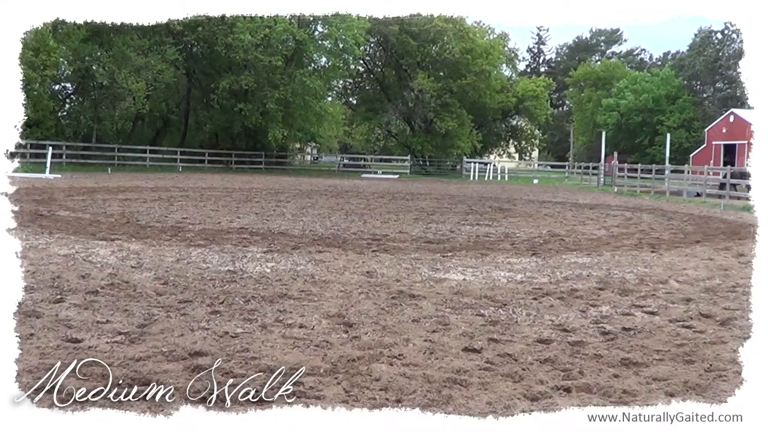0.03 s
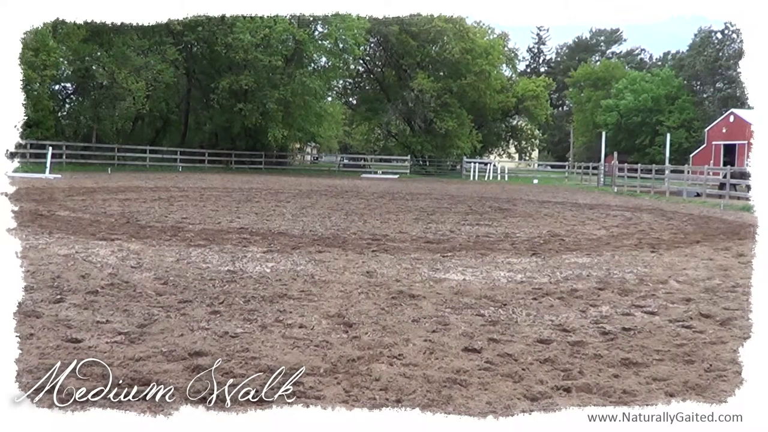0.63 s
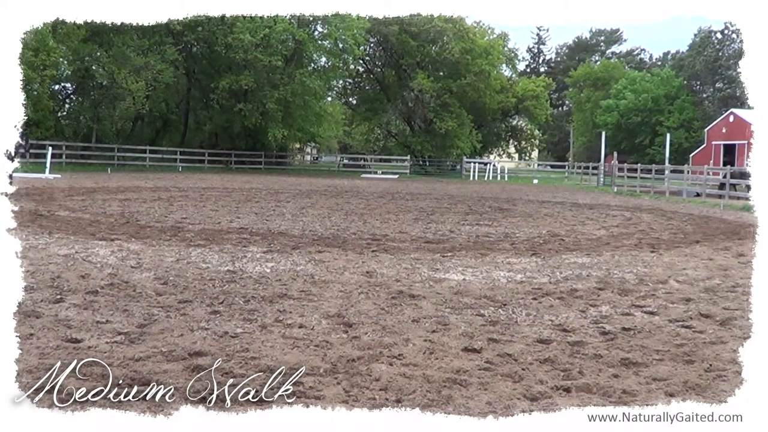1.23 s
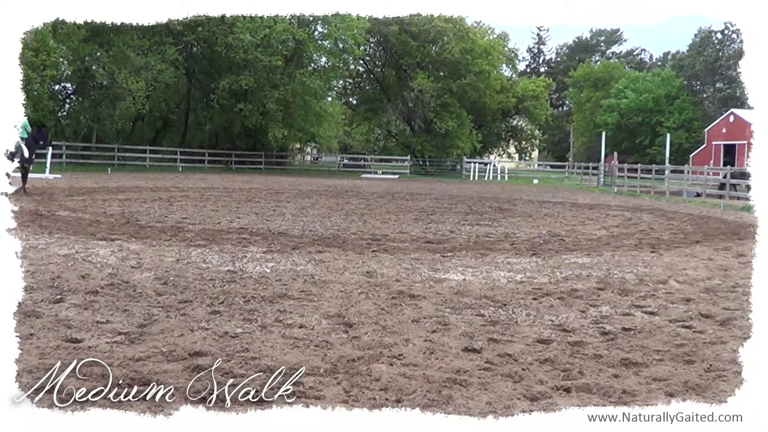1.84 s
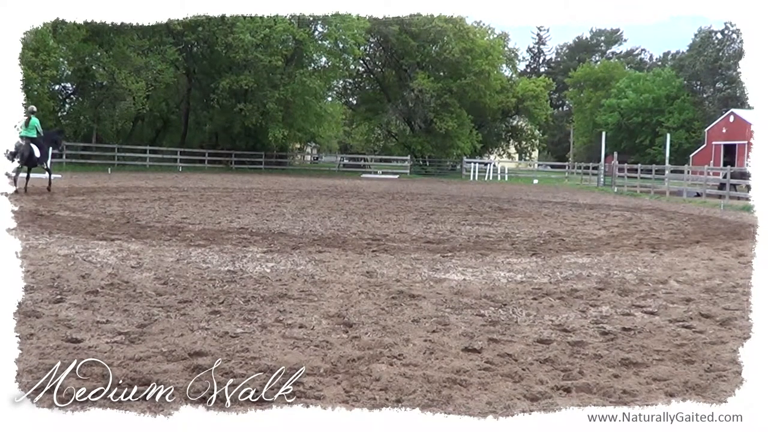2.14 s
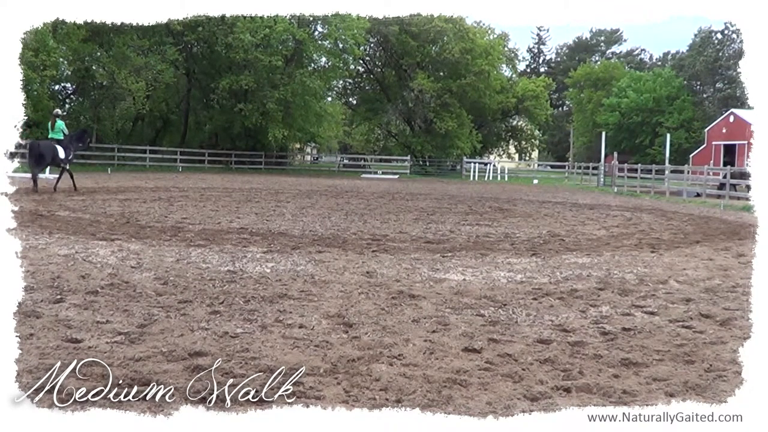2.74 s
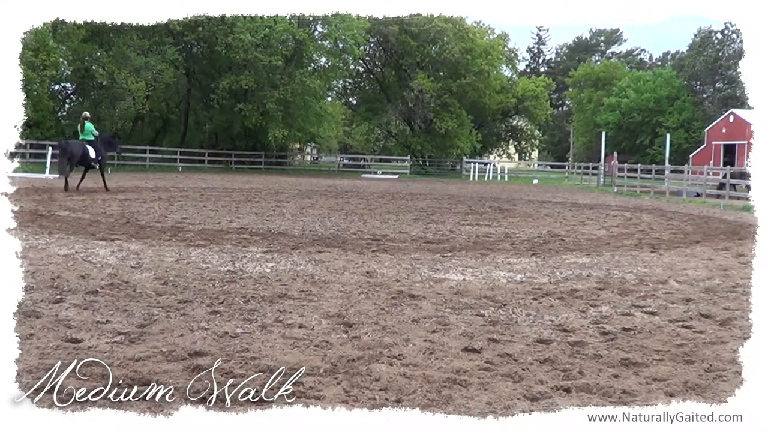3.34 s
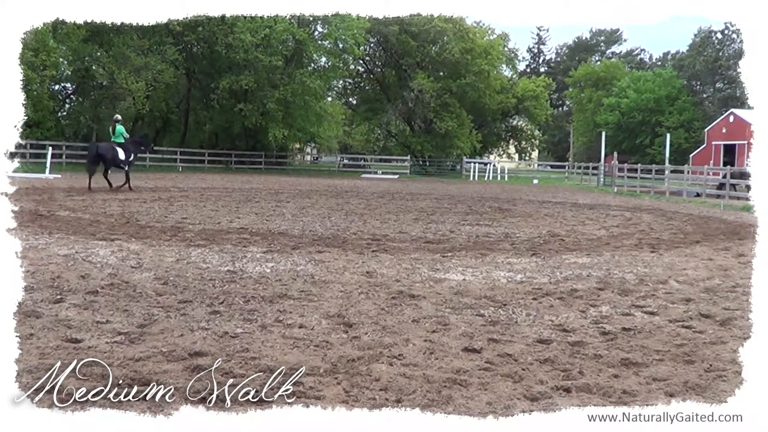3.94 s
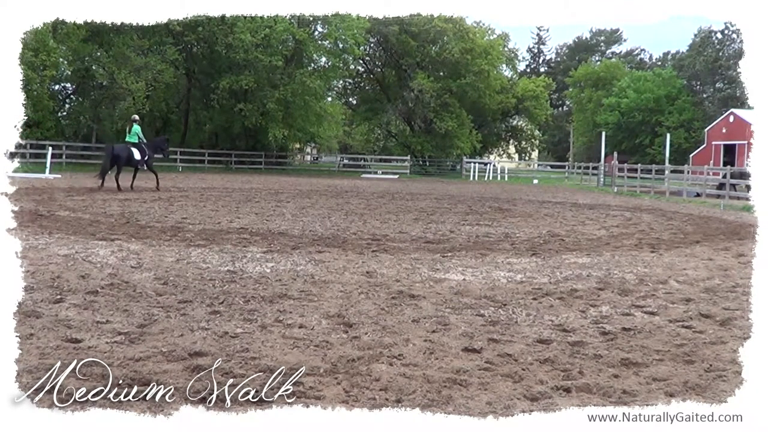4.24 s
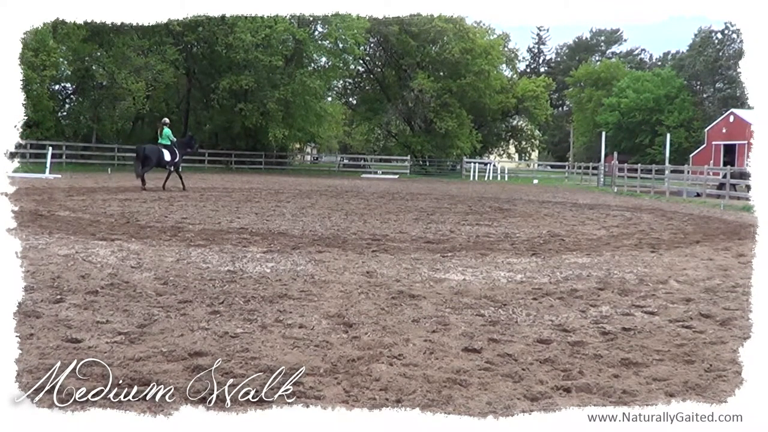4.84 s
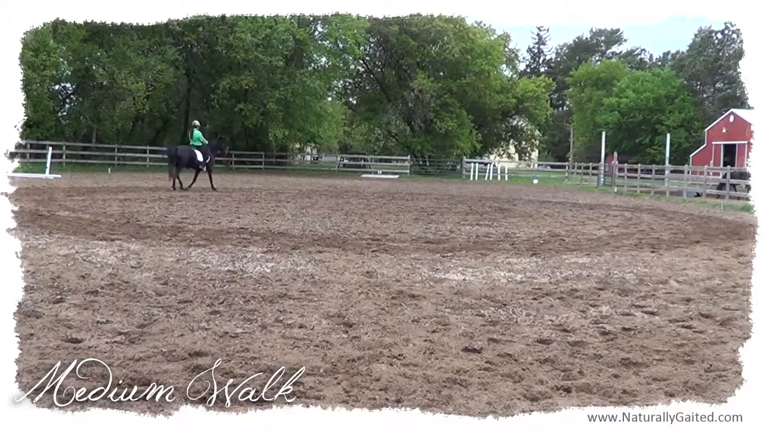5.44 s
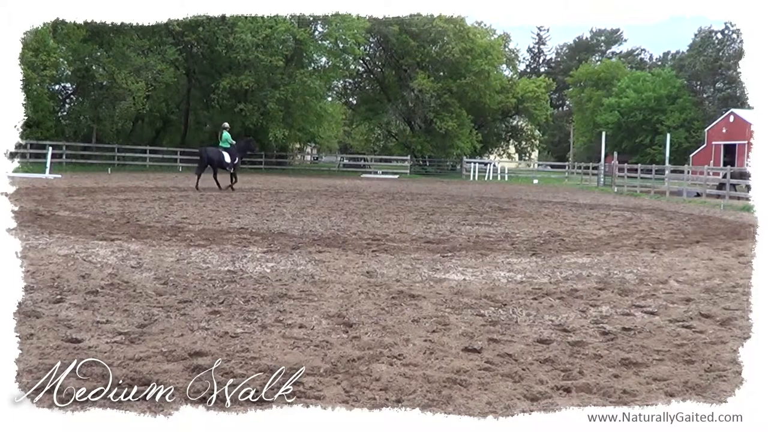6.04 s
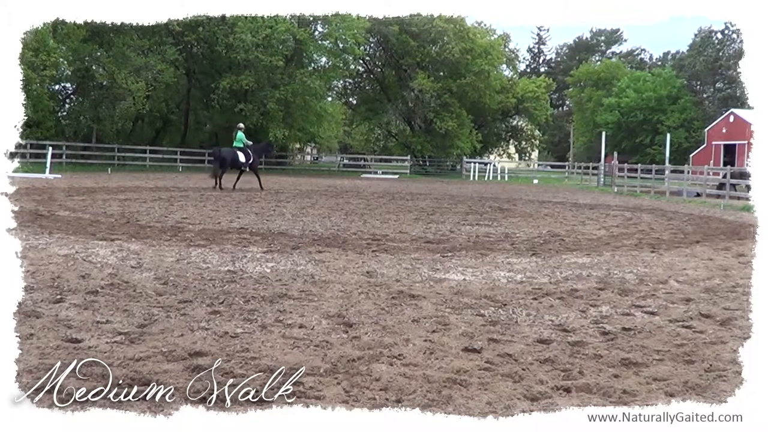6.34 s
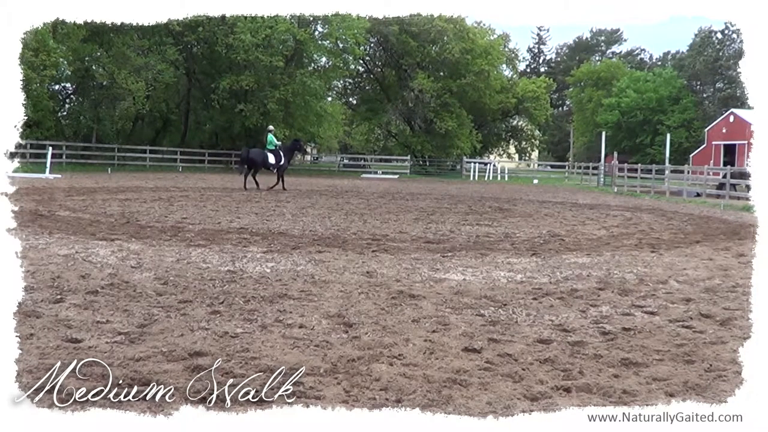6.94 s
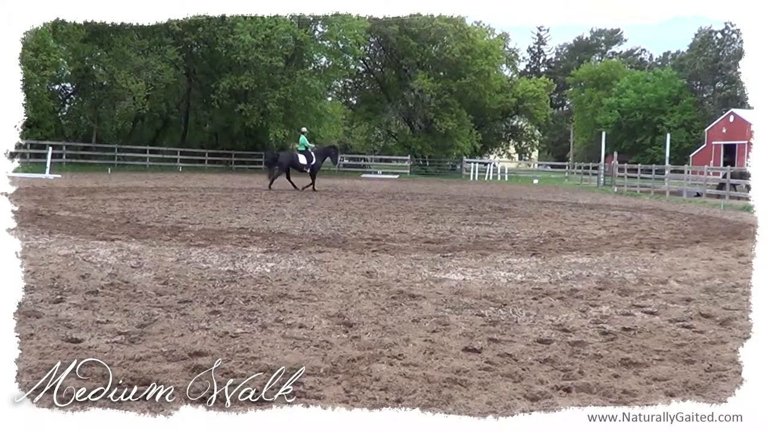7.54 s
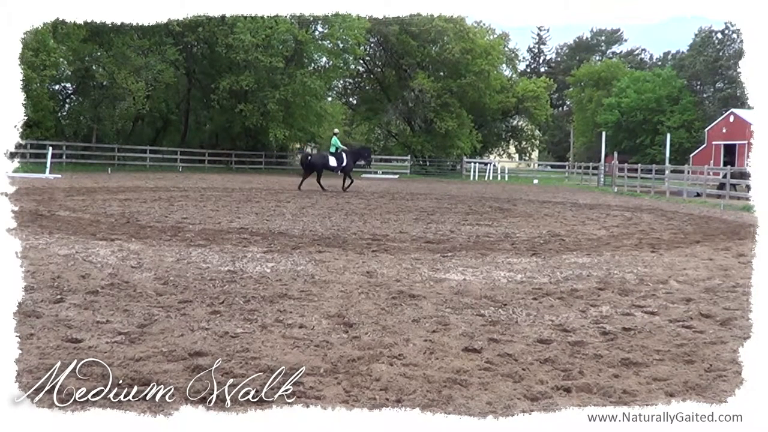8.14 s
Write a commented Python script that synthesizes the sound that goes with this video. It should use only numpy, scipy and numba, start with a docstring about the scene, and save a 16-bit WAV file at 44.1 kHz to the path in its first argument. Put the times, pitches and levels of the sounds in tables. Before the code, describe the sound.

Wind buffets the microphone in one strong gust, then light puffs, over steady hiss and faint distant birds.

```python
"""Wind buffets a camcorder beside an outdoor riding arena: one strong gust, then light puffs.
Eddies sweep over the two microphone ports, louder and higher the faster they pass.
Behind them: hiss, the camcorder's whine, light metal clinks, faint birds in the trees,
an insect and soft scuffs in the sand. The camcorder turns its gain down on loud treble peaks."""
import sys
import numpy as np
from scipy import signal
from scipy.fft import rfft, irfft, next_fast_len
from scipy.io import wavfile
from scipy.ndimage import uniform_filter1d, map_coordinates
from numba import njit

SR = 44100
rng = np.random.default_rng(int(sys.argv[2]) if len(sys.argv) > 2 else 0)


def persist_wave(psi):
    """Save psi, clipped to +-1, as 16-bit WAV."""
    counts = np.round(np.clip(psi, -1, 1) * 32767).astype(np.int16)
    wavfile.write(sys.argv[1], SR, np.atleast_2d(counts).T)


N = 360738
T = np.arange(N) / SR

# Wind between buffets. Each row: time in seconds, large-eddy level in dB.
BASE_WIND = [(.07, -35.5), (.25, -27.5), (.62, -28.5), (.76, -38.5), (.9, -31), (1.01, -36), (1.12, -25),
             (1.3, -21), (1.5, -24.5), (1.6, -29.5), (1.9, -34.5), (2.1, -39), (2.22, -52), (2.9, -52),
             (3.14, -37.5), (3.5, -44.5), (3.75, -58), (4.2, -53.5), (4.48, -44.5), (4.7, -58), (5.8, -57),
             (6.02, -44), (6.7, -58), (6.92, -47.5), (7.08, -51.5), (7.2, -43.5), (7.45, -45.5),
             (7.65, -65.5)]
# Rushes of air. Each row: start in seconds, length in seconds, level in dB, extra small eddies in dB.
BUFFETS = [(0.058, 0.015, -19.5, -2.5), (0.127, 0.036, -30, -2), (0.17, 0.017, -21, -1),
           (0.19, 0.025, -17.5, 1.5), (0.243, 0.015, -20.5, -1), (0.294, 0.024, -18, 2),
           (0.324, 0.066, -20, 1), (0.433, 0.021, -23.5, -3.5), (0.45, 0.04, -17, 1),
           (0.541, 0.017, -17, 0), (0.585, 0.046, -21.5, 1), (0.64, 0.031, -22.5, 1.5),
           (0.681, 0.037, -24, 0.5), (0.785, 0.012, -25.5, -2.5), (0.829, 0.045, -19.5, 0),
           (0.912, 0.074, -23, -0.5), (1.04, 0.028, -17.5, -3), (1.076, 0.086, -18.5, 3),
           (1.193, 0.036, -19.5, -0.5), (1.223, 0.043, -19, 6), (1.264, 0.023, -18, 7.5),
           (1.299, 0.051, -13.5, -1.5), (1.37, 0.034, -16, .5), (1.425, 0.053, -15.5, 2),
           (1.514, 0.031, -23, -1), (1.58, 0.021, -24.5, 2), (1.633, 0.013, -22, -3),
           (1.659, 0.011, -17, 3), (1.743, 0.044, -23.5, 2.5), (1.806, 0.029, -27, 2.5),
           (1.924, 0.073, -35, -1), (2.041, 0.045, -38.5, -2), (2.138, 0.023, -41, 0),
           (2.252, 0.023, -42.5, -0.5), (2.349, 0.021, -47, -1.5), (2.484, 0.027, -37.5, -3),
           (2.545, 0.012, -44.5, -0.5), (2.659, 0.038, -41, -3), (2.744, 0.013, -50.5, -1.5),
           (2.81, 0.02, -44, -1), (2.853, 0.015, -39, 3), (2.905, .012, -39, -2), (2.976, 0.04, -33, -1.5),
           (3.039, 0.021, -28, -6), (3.092, 0.013, -21, 4.5), (3.107, 0.065, -28, 1.5),
           (3.204, 0.02, -32.5, -3.5), (3.244, 0.012, -33, -4), (3.305, 0.013, -30, 4.5),
           (3.327, 0.016, -34, -9.5), (3.377, 0.082, -34.5, 6), (3.471, 0.03, -35, -1),
           (4.007, 0.055, -40.5, 0), (4.098, 0.018, -43, -3.5), (4.296, 0.019, -38.5, -6),
           (4.343, 0.039, -33, -4), (4.414, 0.12, -40.5, 1.5), (4.57, 0.033, -44, -1.5),
           (4.784, 0.018, -43.5, -2.5), (4.947, 0.027, -47, -2.5), (5.057, .02, -46, -3),
           (5.092, 0.021, -40, -8.5), (5.181, 0.036, -44.5, -8.5), (5.243, 0.053, -43.5, -3.5),
           (5.404, 0.032, -47, -3.5), (5.559, .018, -44, -6), (5.641, 0.04, -43, -4),
           (5.744, 0.027, -41.5, -9), (5.871, 0.021, -41, 0.5), (5.922, 0.092, -36, 2.5),
           (6.054, 0.027, -37.5, -2), (6.095, 0.076, -37, -6.5), (6.204, 0.023, -33.5, -7.5),
           (6.357, 0.094, -40, 0), (6.604, 0.021, -44.5, -4.5), (6.868, 0.024, -37.5, -6.5),
           (6.943, 0.085, -42.5, -2), (7.178, 0.045, -35.5, 1.5), (7.331, 0.1, -40.5, 2),
           (7.461, 0.042, -44.5, 2), (7.83, 0.022, -51, -4.5), (8.128, 0.02, -55, -1)]
# Eddy pressure at unit speed. Each row: frequency in Hz, spectral density in dB.
EDDY_SPECTRUM = [(20, -45), (50, -23), (100, -8.5), (170, 0.5), (250, 3.5), (400, -0.5), (600, -7.5),
                 (1000, -15.5), (1500, -23.5), (2200, -36), (3200, -50), (6000, -99)]
# Which port takes more wind. Each row: time in seconds, left minus right in dB.
PORT_EXPOSURE = [(0, 6), (1.8, 10), (2.6, -9), (3.2, -9), (4.5, -10), (6, -1), (8.2, 3)]
# Stereo circuit response. Each row: frequency in Hz, side minus mid in dB.
WIDENING = [(25, 3), (60, -4.5), (130, -9), (240, -5), (400, -.5), (700, 3.5), (1300, 4.5), (2400, 1.5),
            (5000, -2)]
# Background hiss. Each row: frequency in Hz, relative spectral density in dB.
HISS_SPECTRUM = [(20, -20), (60, 18.5), (120, 13.5), (220, 6.5), (400, 4.5), (850, 4.5), (1450, -3.5),
                 (1750, -0.5), (2100, -4.5), (3000, -4.5), (3300, -0.5), (3700, -3.5), (4300, -4),
                 (5000, -6.5), (6500, -9), (11000, -9), (16000, -11)]
# Hiss width. Each row: frequency in Hz, side minus mid in dB.
HISS_WIDTH = [(60, -34), (200, -3), (600, -3.5), (1300, 0.5), (2400, -2.5), (4400, -4), (8000, -3.5),
              (10500, -15), (14000, -40)]
# Breeze in the trees. Each row: time in seconds, hiss gain in dB.
BREEZE = [(0, 0.5), (1, 1.6), (2.3, 0.3), (3, 1), (3.6, 2.3), (4.1, 0.5), (5.2, -0.5), (7, 0.1), (7.5, 0.6),
          (8.2, -1.5)]
# Camcorder tones. Each row: frequency in Hz, level in dB, pulse sharpness, waver in dB.
WHINE_TONES = [(2457.6, -68.7, .35, 2.5), (2517.6, -71.7, .5, 2.5), (10010, -75.7, 1.5, .5),
               (15554.5, -80, 5, .3), (15734.3, -66.5, .1, .3)]
# Lone eddies. Each row: start in seconds, peak in dB, pitch in Hz.
SLAPS = [(0.486, -18, 298), (0.62, -11, 297), (1.371, -5.5, 249.2), (1.419, 0, 240.2), (1.506, -11.5, 220),
         (1.584, -20.5, 549.5), (1.602, -15, 291.5), (1.649, -9.5, 420.2), (1.715, -22, 501),
         (1.729, -12, 232.7), (1.744, -25, 640), (1.808, -19.5, 440), (1.82, -16, 217.4),
         (1.837, -22, 339.5), (1.869, -14, 228.9), (1.995, -29, 548), (3.09, -15, 281), (3.272, -16.5, 446)]
# Metal contacts, as of tack. Each row: start in seconds, peak in dB.
CLINKS = [(0.581, -42), (5.793, -45), (7.05, -49), (7.663, -44)]
# Metal modes. Each row: frequency in Hz, relative level in dB, T60 in seconds.
CLINK_MODES = [(2960, 7, 0.033), (4310, 4, 0.057), (5400, -9, 0.018), (5470, -7, .02), (6800, -20, .01)]
# Bird whistles. Each row: start in seconds, length in seconds, pitch in Hz, level in dB.
WHISTLES = [(0.778, 0.041, 3450, -62.5), (0.958, 0.087, 4410, -62), (1.96, 0.064, 4573, -56.5),
            (2.092, 0.085, 4410, -58), (3.896, 0.063, 5130, -64), (7.262, 0.0456, 6104, -63),
            (7.357, 0.047, 6084, -60), (7.436, 0.031, 6120, -67)]
# Insect buzzes. Each row: start in seconds, length in seconds, level in dB.
BUZZES = [(0.88, 0.2, -64.5), (2.37, 0.35, -68), (3.856, 0.12, -70)]
# Twitters that stand out. Each row: start in seconds, pitch in Hz, level in dB.
TWITTERS = [(1.173, 4266, -59), (2.06, 4153, -57), (3.175, 4566, -64), (3.199, 4052, -61.5),
            (3.222, 3875, -65.5), (3.599, 4300, -64), (3.64, 4140, -64), (3.742, 3936, -62),
            (3.795, 4875, -64), (4.179, 4320, -66), (4.359, 4072, -65), (4.866, 4180, -65),
            (5.27, 4570, -69), (5.455, 4040, -65), (5.625, 4576, -63), (5.707, 4170, -61),
            (6.293, 4395, -59), (6.34, 4260, -60), (7.37, 4630, -61)]
# Quick rising chips. Each row: start in seconds, pitch in Hz, level in dB.
CHIPS = [(3.258, 4290, -59), (3.355, 5100, -63), (3.453, 5150, -59), (3.575, 5370, -55), (3.741, 5300, -62),
         (3.83, 5300, -65)]
# Thin falling bird ticks. Each row: start in seconds, pitch in Hz, level in dB.
TICKS = [(3.813, 9298, -61), (6.456, 9190, -52), (6.972, 7900, -63), (7.047, 7070, -61)]
# Far arched bird calls. Each row: start in seconds, level in dB.
FAR_CALLS = [(4.5, -61), (5.035, -58), (6.531, -65), (7.521, -60), (8.049, -64.5)]
# Scuffs in the sand. Each row: start in seconds, level in dB.
SCUFFS = [(4.43, -65), (4.53, -65), (5.04, -66), (5.79, -54), (7.03, -57), (7.51, -63), (7.65, -62)]

# Bird voices. Each: contour as pitch ratios evenly spaced in time, hoarseness as a share of pitch.
WHISTLE_VOICE = (.92, .99, 1, 1.005, 1, 1.005), .013
TWITTER_VOICE = (1.04, 1, .95), .04
CHIP_VOICE = (.82, 1, 1.11), .01
TICK_VOICE = (1.2, .95, .91), .025
FAR_VOICE = (.94, .99, .93), .075


def undb(db):
    """Decibels to gain."""
    return 10 ** (np.asarray(db) / 20)


def unit(x):
    """Scale to rms 1."""
    return x / np.sqrt(np.mean(x ** 2))


def curve(points):
    """Join (seconds, value) points over the whole scene."""
    return np.interp(T, *np.transpose(points))


def colour(x, points, lag_rad=0):
    """Filter by (Hz, dB) points on a log-frequency axis, with optional phase lag."""
    size = next_fast_len(x.shape[-1])
    hz, db = np.transpose(points)
    bins_hz = np.maximum(np.fft.rfftfreq(size, 1 / SR), 1)
    response = undb(np.interp(np.log(bins_hz), np.log(hz), db)) * np.exp(-1j * lag_rad)
    return irfft(rfft(x, size) * response, size)[..., :x.shape[-1]]


def cut(x, hz, kind, order=2):
    """Butterworth filter."""
    return signal.sosfilt(signal.butter(order, hz, kind, fs=SR, output="sos"), x)


def smooth(x, seconds):
    """Triangular moving average."""
    size = max(int(seconds * SR), 1)
    return uniform_filter1d(uniform_filter1d(x, size), size)


def walk(rate_hz):
    """Random wander, rms 1, about rate_hz turns a second."""
    path = np.interp(T * rate_hz, np.arange(8192), rng.standard_normal(8192))
    return unit(smooth(path, .5 / rate_hz))


def add(track, start_s, sound):
    """Mix a sound into a track."""
    i = max(int(start_s * SR), 0)
    track[i:i + len(sound)] += sound[:N - i]


def stereo(mid, side):
    """Mid and side to left and right."""
    return np.array([mid + side, mid - side])


def sputter(wind_db, rate_hz=125, spread_db=2.1, steadying=.42):
    """Large- and small-eddy gains: flow sputters as eddies break away, less in sustained hard wind."""
    quick = walk(rate_hz)
    flicker_db = spread_db * np.minimum(unit(quick - smooth(quick, seconds=.018)), 2)
    flicker_db *= 1 - steadying * np.interp(wind_db, (-34, -26), (0, 1))
    return unit(undb(flicker_db * 2 / 3)), unit(undb(flicker_db * 4 / 3))  # small swing twice as far


def flow(unrest_db=2.04, full_db=-18, brightening=.33, slowing_per_db=.03373):
    """Large- and small-eddy strength: restless wind plus buffets. Harder air sheds more small eddies."""
    def small_share(db):
        return undb(-5 + brightening * (db - full_db))

    wind_db = curve(BASE_WIND) + unrest_db * walk(13)
    large_power = undb(wind_db) ** 2
    small_power = (undb(wind_db - 2) * small_share(wind_db)) ** 2
    for start_s, length_s, db, extra_db in BUFFETS:
        slowness = np.exp(slowing_per_db * (full_db - db))  # weak buffets swell and fade more slowly
        attack_s, release_s = slowness * .17 * length_s, slowness * .007
        t = np.arange(int((length_s + 10 * release_s) * SR)) / SR
        shape = np.minimum(t / attack_s, 1) * np.exp(-np.maximum(t - length_s, 0) / release_s)
        small = undb(db + extra_db) * small_share(db) * shape ** (1 + brightening)
        add(large_power, start_s, (undb(db) * shape) ** 2)
        add(small_power, start_s, small ** 2)
    large_gain, small_gain = sputter(wind_db)
    return np.sqrt(large_power) * large_gain, np.sqrt(small_power) * small_gain


def eddies(travel_samples, split_hz=400, lumpy_db=5, crackle_db=3):
    """Frozen turbulence carried past one port; large and small eddies come in clumps."""
    pattern = colour(rng.standard_normal(2 * N), EDDY_SPECTRUM)
    pressure = map_coordinates(pattern, [travel_samples], order=3, mode="wrap")
    clumps = walk(130)
    crackle = (clumps + walk(220)) / np.sqrt(2)
    large = cut(pressure, split_hz, "low", order=3) * undb(lumpy_db * clumps)
    small = cut(pressure, split_hz, "high", order=3) * undb(crackle_db * crackle)
    return large, small


def wind(reference_db=-24, headroom_db=-10):
    """Each port meets its own eddies; faster air makes them louder and higher."""
    large, small = flow()
    speed = .55 + .37 * (small / undb(reference_db)) ** .44
    travel_samples = np.cumsum(speed)
    lean = undb(curve(PORT_EXPOSURE) / 2)
    ports = slaps()
    for strength, left, right in zip((large, small), eddies(travel_samples), eddies(travel_samples)):
        pair = np.array([left * lean, right / lean])
        pair_rms = np.sqrt(smooth(np.sum(pair ** 2, axis=0), seconds=.014) + 1e-12)
        ports += pair * strength / pair_rms  # flow sets the energy the ports share
    left, right = undb(headroom_db) * np.tanh(ports / undb(headroom_db))  # capsule overload
    side = colour(left - right, WIDENING, lag_rad=np.pi / 2)  # stereo circuit
    return stereo(left + right, side) + grille(small)


def grille(small, level_db=-52, reference_db=-14, band_hz=(2400, 5000)):
    """At top speed the air tears at the microphone grille: a bright rasp."""
    rasp = unit(cut(rng.standard_normal((2, N)), band_hz, "band"))
    drive = np.minimum(small / undb(reference_db), 1.3)
    return rasp * undb(level_db) * drive ** 4.5


def hiss(level_db=-53.5, sway_db=.26):
    """Far trees and microphone hiss, swelling with the breeze."""
    mid = unit(colour(rng.standard_normal(N), HISS_SPECTRUM))
    side = unit(colour(rng.standard_normal(N), HISS_SPECTRUM))
    gain = undb(level_db + curve(BREEZE) - sway_db * walk(6.3))
    return stereo(mid, colour(side, HISS_WIDTH)) * gain


def whine(field_hz=59.94, whirr_db=-63.5, whirr_hz=2490, width_hz=190, waver_rad_per_db=-.33):
    """Thin camcorder tones pulsing at the field rate, over a narrow whirr."""
    throb = np.cos(2 * np.pi * field_hz * T)
    tones = np.zeros(N)
    for hz, db, sharpness, waver_db in WHINE_TONES:
        tone = np.sin(2 * np.pi * hz * T + waver_rad_per_db * waver_db * walk(27))
        tones += undb(db + waver_db * walk(25)) * unit(np.exp(sharpness * throb) * tone)
    band_hz = [whirr_hz - width_hz / 2, whirr_hz + width_hz / 2]
    mid, side = cut(rng.standard_normal((2, N)), band_hz, "band")
    return tones + undb(whirr_db) * stereo(unit(mid), .3 * unit(side))


def slaps(ring_s=.0035, crack_s=.0027, crack_db=-11, low_hz=110, high_hz=1300, far_port_db=-14):
    """A lone eddy bursts on one port: a thump of a cycle or two and a short, dull crack."""
    out, t = np.zeros((2, N)), T[:SR // 20]
    for start_s, db, hz in SLAPS:
        thump = np.sin(2 * np.pi * hz * t) * np.exp(-t / ring_s)
        noise = unit(cut(rng.standard_normal(len(t)), [400, high_hz], "band", order=3))
        crack = undb(crack_db) * noise * np.exp(-t / crack_s)
        slap = cut(cut(thump + crack, low_hz, "high"), high_hz, "low", order=4)
        slap = undb(db) * slap / np.abs(slap).max()
        port = rng.integers(2)
        add(out[port], start_s, slap)
        add(out[1 - port], start_s, undb(far_port_db) * slap)
    return out


def clinks(click_s=.015, click_band_hz=(3000, 7000)):
    """Small metal pieces touch with a dry click and ring briefly."""
    out, t = np.zeros(N), T[:SR // 10]
    for start_s, db in CLINKS:
        ring = sum(undb(mode_db - 60 * t / t60_s) * np.sin(2 * np.pi * hz * t)
                   for hz, mode_db, t60_s in CLINK_MODES)
        click = cut(rng.standard_normal(len(t)), click_band_hz, "band") * np.exp(-t / click_s)
        clink = unit(ring) + unit(click)
        add(out, start_s, undb(db) * clink / np.abs(clink).max())
    return out


def sing(notes):
    """Bird notes: sines bent through a contour, made hoarse by fast pitch flutter."""
    out, flutter = np.zeros(N), walk(400)
    for start_s, length_s, pitch_hz, db, (contour, hoarseness) in notes:
        progress = np.linspace(0, 1, int(length_s * SR))
        hz = pitch_hz * np.interp(progress, np.linspace(0, 1, len(contour)), contour)
        hz *= 1 + hoarseness * np.interp(start_s + progress * length_s, T, flutter)
        arch = np.sqrt(8 * progress * (1 - progress))
        add(out, start_s, undb(db) * arch * np.sin(2 * np.pi * np.cumsum(hz) / SR))
    return out


def whistles():
    """Nearest birds: clear notes that scoop up and hold."""
    return sing([(start_s, length_s, hz, db, WHISTLE_VOICE) for start_s, length_s, hz, db in WHISTLES])


def treeline(x, echo_db=-1, t60_s=.075):
    """Distant sounds arrive with a diffuse echo from the trees."""
    tail = rng.standard_normal((2, SR)) * undb(-60 * T[:SR] / t60_s)
    tail /= np.sqrt(np.sum(tail ** 2, axis=1, keepdims=True))
    echo = signal.fftconvolve(x[None], tail, axes=1)[:, :N]
    return (x + undb(echo_db) * echo) / np.hypot(1, undb(echo_db))


def insect(centre_hz=9400, width_hz=900):
    """Short, high, dry buzzes barely above the hiss."""
    band_hz = [centre_hz - width_hz / 2, centre_hz + width_hz / 2]
    rasp = unit(cut(rng.standard_normal(N), band_hz, "band", order=1))
    envelope = np.zeros(N)
    for start_s, length_s, db in BUZZES:
        add(envelope, start_s, undb(db) * signal.windows.tukey(int(length_s * SR), .8))
    return envelope * rasp


def birds(twitter_s=.042, chip_s=.028, tick_s=.0102, far_s=.055, far_hz=1826):
    """Twitters, chips, ticks and hoarse far calls."""
    return sing([(start_s, twitter_s, hz, db, TWITTER_VOICE) for start_s, hz, db in TWITTERS]
                + [(start_s, chip_s, hz, db, CHIP_VOICE) for start_s, hz, db in CHIPS]
                + [(start_s, tick_s, hz, db, TICK_VOICE) for start_s, hz, db in TICKS]
                + [(start_s, far_s, far_hz, db, FAR_VOICE) for start_s, db in FAR_CALLS])


def flock(count=160, span_s=(3.1, 6.9), pitch_hz=4280, spread_hz=280, note_s=2 * .042, db=-72.5):
    """Small birds deep in the trees blur into a soft twitter."""
    return sing([(rng.uniform(*span_s), note_s, pitch_hz + spread_hz * rng.uniform(-1, 1),
                  db, TWITTER_VOICE) for _ in range(count)])


def scuffs(band_hz=(1000, 4500), attack_s=.015, decay_s=.081, grain_db=3):
    """Soft gritty scuffs, as of hooves in sand."""
    grit = cut(rng.standard_normal(N), band_hz, "band") * undb(grain_db * walk(300))
    push, t = np.zeros(N), T[:SR // 2]
    for start_s, db in SCUFFS:
        add(push, start_s, undb(db) * np.minimum(t / attack_s, 1) * np.exp(-t / decay_s))
    return push * unit(grit)


def scene():
    """Wind close up, all else faint behind it."""
    direct = wind() + hiss() + whine() + clinks()
    near_birds = treeline(whistles(), echo_db=-5)
    distant = treeline(birds() + flock() + insect() + scuffs())
    return direct + near_birds + distant


@njit
def follow(x, attack_s, release_s):
    """Peak follower."""
    rise, fall = 1 / (attack_s * SR), 1 / (release_s * SR)
    out, level = np.empty(len(x)), 0.
    for i in range(len(x)):
        level += (x[i] - level) * (rise if x[i] > level else fall)
        out[i] = level
    return out


def record(dry, start_s=.0685, threshold_db=-21.5, sense_hz=1500, top_hz=15850):
    """The sound begins abruptly. Camcorder: gain turned down on loud treble peaks, steep low-pass."""
    sound = dry * (T >= start_s)
    treble = np.abs(cut(sound, sense_hz, "high")).max(axis=0)
    peak = follow(treble, attack_s=.0025, release_s=1.42)
    sound /= np.maximum(peak / undb(threshold_db), 1)
    return signal.sosfilt(signal.ellip(12, .2, 70, top_hz, fs=SR, output="sos"), sound)


dry = scene()
out = record(dry)
persist_wave(out)
```